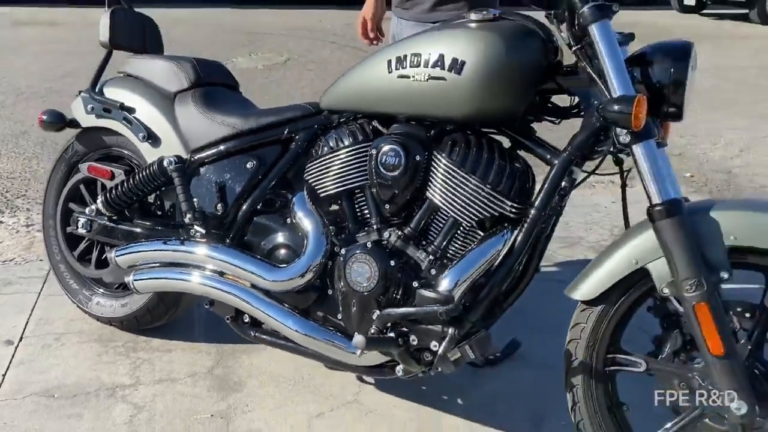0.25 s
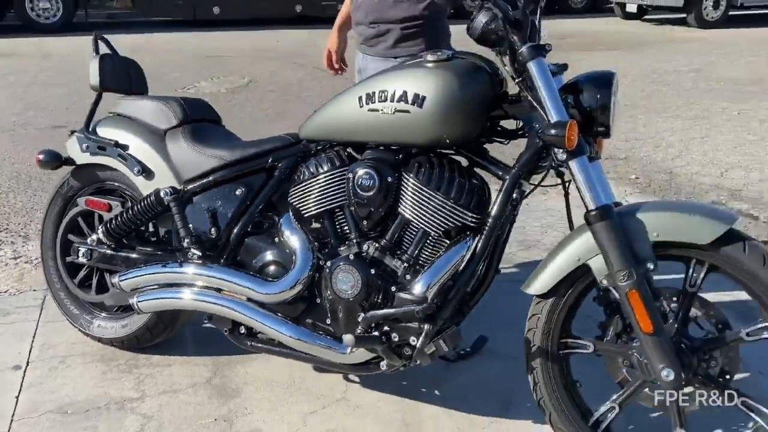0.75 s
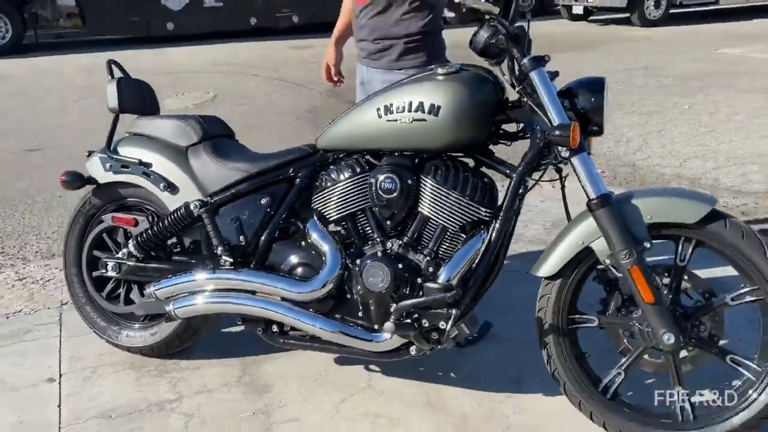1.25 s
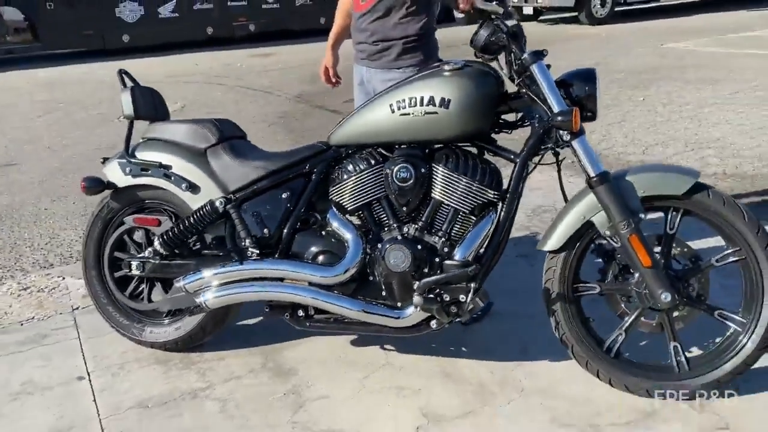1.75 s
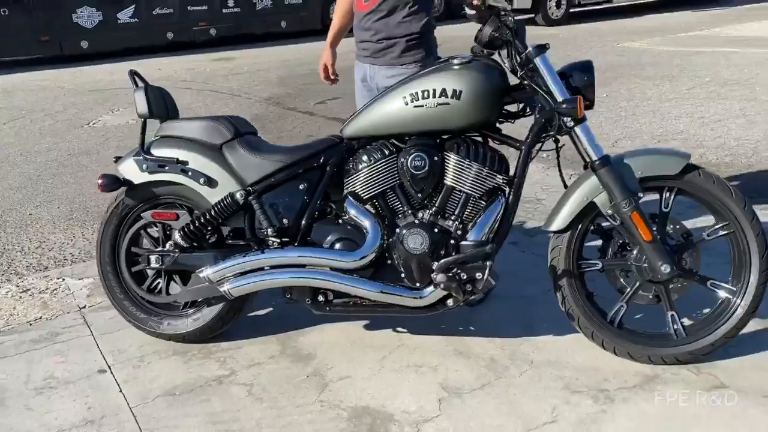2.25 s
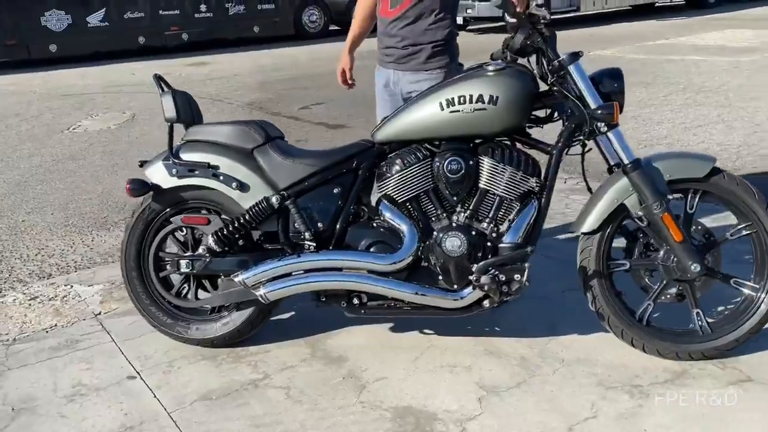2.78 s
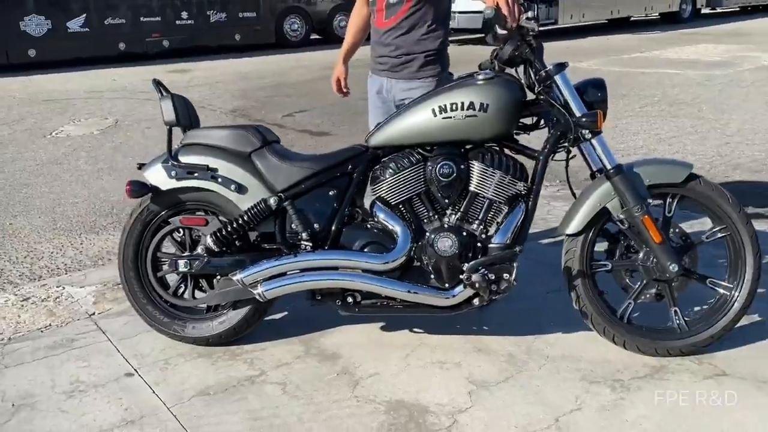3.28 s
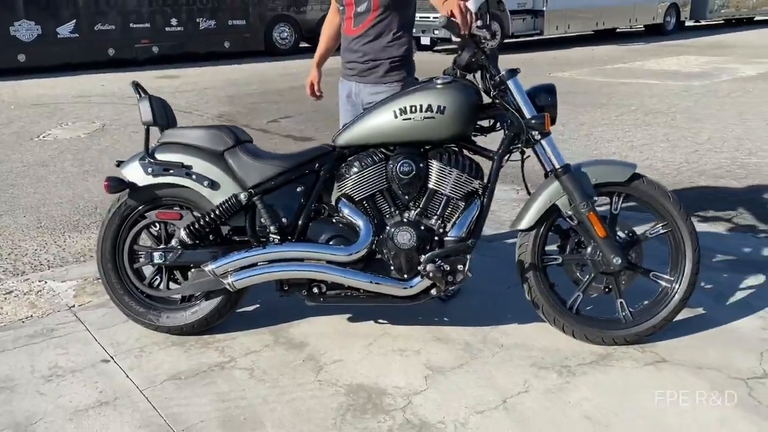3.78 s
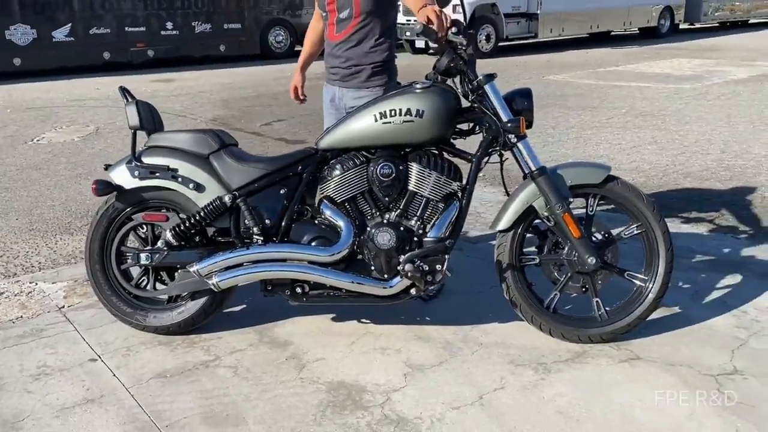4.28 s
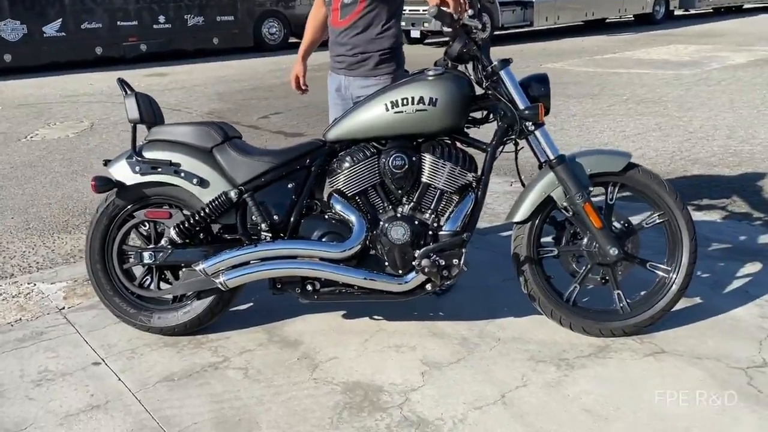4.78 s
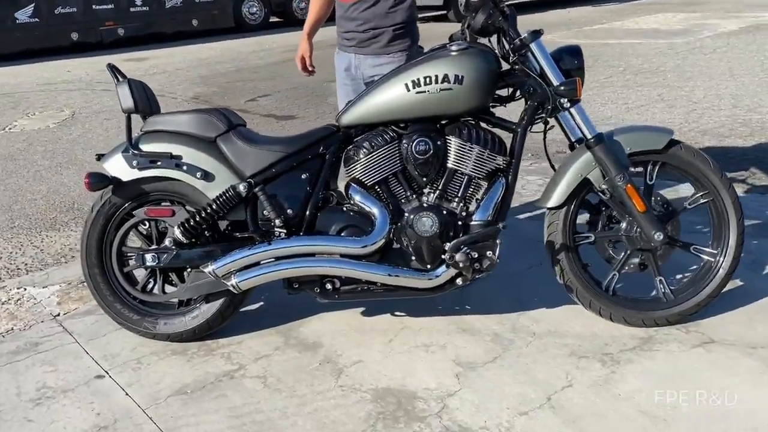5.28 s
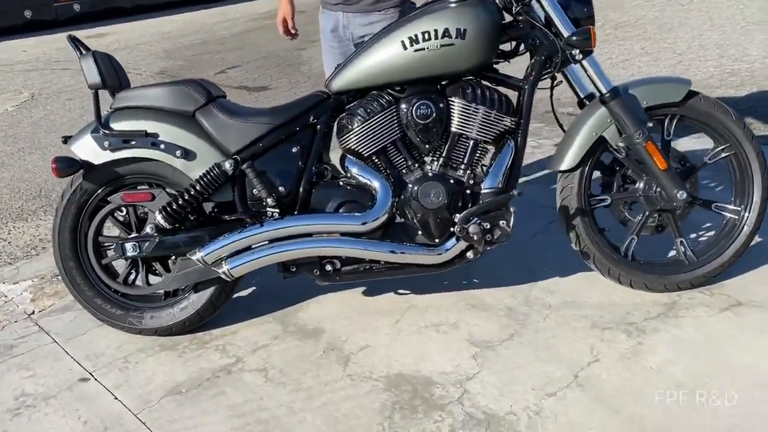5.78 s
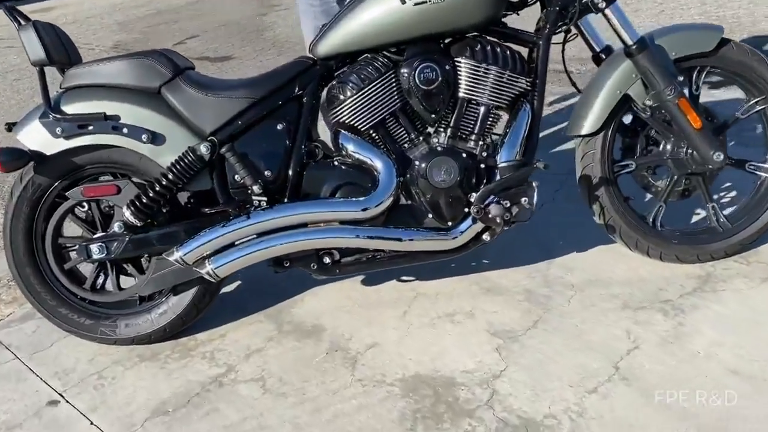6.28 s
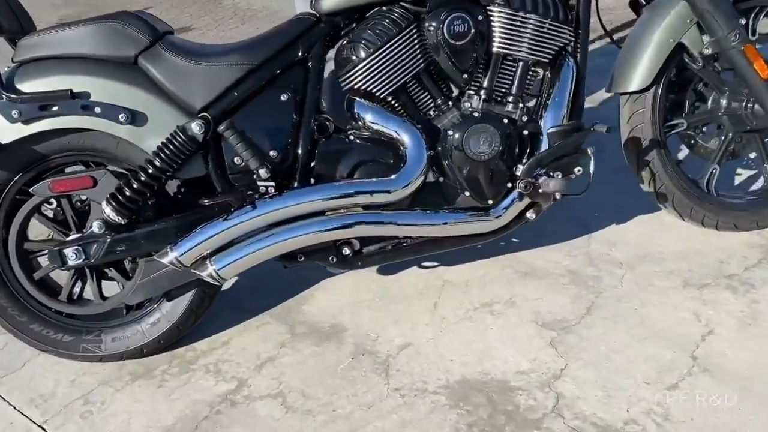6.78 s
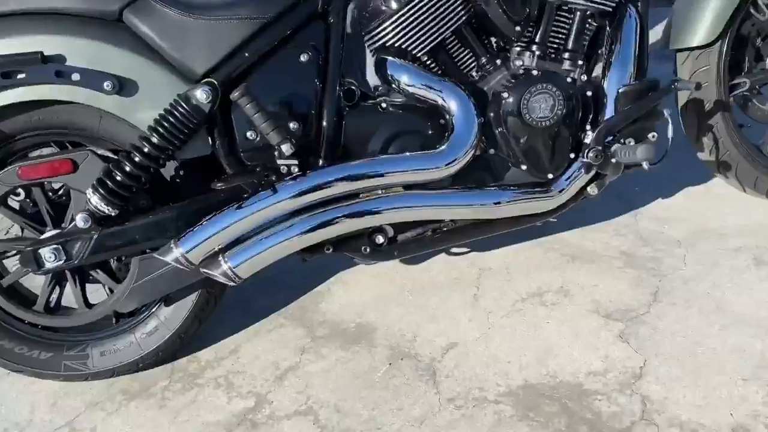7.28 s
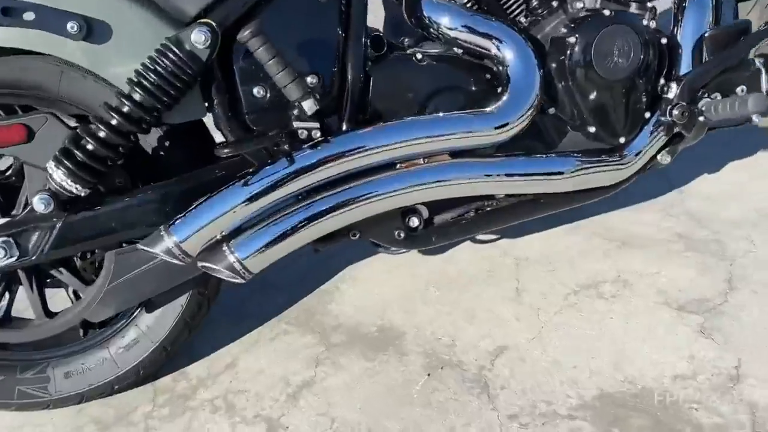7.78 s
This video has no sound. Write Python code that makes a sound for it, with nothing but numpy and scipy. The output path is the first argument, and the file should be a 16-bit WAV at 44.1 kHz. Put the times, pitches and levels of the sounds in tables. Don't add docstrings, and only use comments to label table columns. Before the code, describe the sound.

Short-piped motorcycle exhaust, heard outdoors by a small stereo microphone. Eight throttle blips of varied length surge from a loping, separate-beat rumble to a tearing drone, then slacken with stumbles and pops. Faint valve ticks and a very thin electrical whine show from about two seconds. The sound is farthest near four seconds, close and heavy at the end, over a faint distant outdoor wash.

```python
import sys
import numpy as np
from scipy import signal
from scipy.fft import rfft, irfft, next_fast_len
from scipy.io import wavfile
from scipy.ndimage import uniform_filter1d

SR = 44100
rng = np.random.default_rng(int(sys.argv[2]) if len(sys.argv) > 2 else 0)


def persist_wave(psi):
    counts = np.round(np.clip(psi, -1, 1) * 32767).astype(np.int16)
    wavfile.write(sys.argv[1], SR, np.atleast_2d(counts).T)


def volts_from_decibels(level):
    exponent = np.asarray(level, float) / 20
    return 10 ** exponent


N = 354563
TIME = np.arange(N) / SR
TICKS = np.arange(0, N / SR, .001)

# (opens [s], shuts [s], first charges fall short [dB], overrun after it [dB])
THROTTLE = [
    (-.1, 0, 0, 6),
    (0.18, 0.429, -1, 2),
    (0.605, 0.948, -3, 0),
    (1.935, 2.419, -6.5, -0.5),
    (3.643, 3.796, -6, -1.5),
    (3.992, 4.136, -10.5, -1),
    (4.275, 4.678, -9, -0.5),
    (5.484, 5.988, -7.5, 0.5),
    (7.615, 8.1, -2, -2),
]
# (picks up [s], tops out [s], top speed [cycles/s],
# braking after it [cycles/s per s], bow of the climb [ratio])
SPURTS = [
    (-0.1, -0.0, 21.0766, 53.7963, 0.2623),
    (0.1624, 0.434, 32.2409, 54.0419, 0.519),
    (0.5406, 0.898, 44.8863, 31.9573, 0.5502),
    (1.8494, 2.4152, 45.597, 32.9884, 0.9907),
    (3.5751, 3.7773, 25.9394, 64.9064, -0.6302),
    (3.901, 4.1351, 28.4668, 58.8902, 0.1376),
    (4.2244, 4.6555, 44.3094, 31.766, 0.8909),
    (5.4213, 6.0254, 45.5299, 33.1636, 1.3948),
    (7.6311, 8.039, 40.0127, 34.0, 0.6009),
]
# (from [s], to [s])
STUMBLE = [
    (.45, .6),
    (.97, 1.16),
    (2.44, 2.6),
    (4.7, 4.88),
    (6.0, 6.22),
]
CUT_DEPTH = [.5, 0.22, 0.5, 0.23, 0.88]
# boom, rasp, hiss [dB]
CUT_DB = [2.5, 1, -3]
# boom, rasp, hiss [dB]
NEAR_DB = [1.5, 2, 1]
# (speed [cycles/s], boom [dB], rasp [dB], hiss [dB])
PULLING = [(13.5, -14.5, -23, -24), (25.2, -13, -19.5, -21), (36.3, -15.5, -16.5, -19),
           (45.7, -17, -17.5, -18)]
# (speed [cycles/s], boom [dB], rasp [dB], hiss [dB])
COASTING = [(13.4, -30, -54, -70), (15.86, -24, -43.5, -58.5), (19.67, -18.5, -40.5, -49),
            (28.5, -16, -34, -39), (35.5, -14, -30, -36), (48.6, -17, -29.5, -32.5)]
# (frequency [Hz], width [Hz], level [dB])
FRONT_PIPE = [(107.4, 33.4, 2), (164.8, 50.7, 0.5), (264, 53, 2.5), (338, 50, -8), (426, 40, -23.5)]
# (frequency [Hz], width [Hz], level [dB])
REAR_PIPE = [(95.9, 37, 6), (195, 37, 2), (280, 31, 1), (311, 29, -8), (500, 42, -6)]
# (frequency [Hz], width [Hz], level [dB])
TIP_FAR = [(587, 1270, -9.5), (875, 106, 1.5), (1037, 210, -4.5), (1586, 297, 0), (2183, 266, -8)]
# (frequency [Hz], width [Hz], level [dB])
TIP_NEAR = [(640, 290, -5), (850, 187, 0), (1063, 180, -1), (1390, 350, -8), (1970, 380, -7)]
# (frequency [Hz], width [Hz], level [dB])
CONCRETE_BARK = [(1620, 190, -11)]
# (frequency [Hz], level [dB per Hz])
JET = [(1500, -56), (2300, -8.5), (3400, -3.5), (4700, -2.5), (6000, -10), (7400, -8.5), (8400, -19),
       (9400, -11.5), (10500, -12.5), (13500, -18), (15800, -27)]
# (frequency [Hz], level [dB per Hz])
VALVE_CLICK = [(2000, -40), (4500, -18), (9000, -7), (13000, -1), (15800, 0)]
# (frequency [Hz], level [dB rms])
CHARGING_TONES = [(14298, -63), (15332, -67), (13608, -72)]
# (frequency [Hz], level [dB per Hz])
YARD_WASH = [(25, -26), (50, -10.5), (300, 1), (1000, -14), (3000, -24), (8000, -42.5), (16000, -40)]
# (frequency [Hz], left leads by [rad])
LEFT_LEADS = [(0, 0), (1120, 0.6), (2410, 3.1), (3270, 7.1), (6630, 6.3), (9560, 0.4), (12900, 0.1),
              (16100, -6.3)]
# (frequency [Hz], left minus right [dB])
LEFT_OVER_RIGHT = [(380, 0.0), (700, 1.0), (1290, -1.0), (2380, 0.0), (4400, 7.5), (8120, 1.0),
                   (15000, 0.0)]
# (frequency [Hz], likeness [ratio])
LIKENESS = [(60, 1), (300, 1), (700, 0.9), (1400, 0.96), (3000, 0.27), (6000, 0.45), (15000, 0.6)]

START, VEE = -.72, .432
IDLE, KNEE = 12.8022, 6.9781
EASE = 1.5834
RETARD, RETARD_S, RETARD_AFTER_S = .1597, .0336, .0089
FILL_S = 0.13
SOFT_HZ, DULL_HZ, DULL_DB = 377, 193, 4
FARTHEST_S, FAR_SPAN_S = 3.85, 0.99
TAPPET_DB, TAPPET_S, TAPPET_SCATTER_DB = -38, .0007, 3.5
LOOSEST, LOOSE_SPAN = 26, 10


def exhaust():
    front = cylinder(0, FRONT_PIPE, size_db=2.5, lag=0.00297)
    rear = cylinder(VEE, REAR_PIPE, size_db=0.5, lag=0.00237)
    boom, rasp, hiss, shock = np.add(front, rear)
    ragged = rasp * crackle(2.17) + volts_from_decibels(3.0) * shock * [[1], [.45]]
    near = closeness(TIME)
    tips = filtered((1 - near) * ragged, modes(TIP_FAR, sign=-0.92))
    tips += filtered(near * ragged, modes(TIP_NEAR, sign=-1.047))
    far = np.exp(-((TIME - FARTHEST_S) / FAR_SPAN_S) ** 2)
    tips -= filtered(far * ragged, modes(CONCRETE_BARK, sign=-1))
    torn = volts_from_decibels(4.5) * filtered(tips, lambda hz: (1j * hz / (330 + 1j * hz)) ** 2) / 0.25
    torn += volts_from_decibels(2) * filtered(hiss * crackle(0.28), lambda hz: volts_from_decibels(along(JET, hz))) / 0.51
    churn = 3.5 * boom * uniform_filter1d(rng.standard_normal((2, N)), size=300)
    return ports(torn + churn + volts_from_decibels(11.5) * boom * [[1], [.45]])


def cylinder(offset, pipe, size_db, lag):
    speed = revs(TIME)
    crank = START + np.cumsum(speed) / SR - offset
    turn = np.floor(crank).astype(int) + 2
    fired = np.interp(np.arange(turn[-1] + 1) - 2, crank, TIME, left=-.03)
    since = TIME - fired[turn]
    boom_db, rasp_db, hiss_db = loudness(fired + 0.0018)
    stumble = sum((fired > a) & (fired < b) for a, b in STUMBLE)
    luck = rng.standard_normal((len(fired), 3))
    each = volts_from_decibels(size_db)
    burn = np.clip((hiss_db - boom_db + 24.0) / 9, 0, 1)
    charge = burn[turn]

    late = (0.0006 * stumble * luck[:, 2])[turn]
    width = (.075 - 0.042 * charge) / speed + 0.00011
    closing = (.49 - 0.1954 * charge) / speed
    suck = 0.35 + 0.049 * charge + 0.054 * np.maximum(21 - speed, 0)
    stroke = puff(since - lag - late, width)
    stroke -= suck * puff(since - lag - closing, 1.04 * width)
    gas = volts_from_decibels(boom_db - 2.5 * stumble + (.7 + 1.8 * stumble) * luck[:, 0])[turn] * stroke
    gas = each * gas * (0.0034 / width) ** 0.16 * (30 / speed) ** 0.32

    edge = np.clip(0.95 * burn + 1.06 * stumble + 0.033 * (revs(fired) - 22), 0, 1)[turn]

    def pipe_response(hz):
        blunt = volts_from_decibels(DULL_DB) / np.hypot(1, hz / DULL_HZ) / (1 + (hz / SOFT_HZ) ** 8)
        return modes(pipe, sign=0.99)(hz) * np.array([1 + 0 * hz, blunt])

    boom = filtered(np.array([edge, 1 - edge]) * gas, pipe_response).sum(axis=0)

    scatter_db = (1.5 + 1.6 * stumble) * luck[:, 1]
    slow = (30 / speed) ** 0.06 * (1.15 - 0.25 * charge)
    leak_db = 4.2 * (1 - charge)
    rasp_gate = 1.12 * puff(since + 0.00049, 0.0041 * slow) ** 1.42 + volts_from_decibels(-23 + leak_db)
    rasp = volts_from_decibels(rasp_db + scatter_db)[turn] * (30 / speed) ** 0.4 * rasp_gate
    hiss_gate = 1.26 * puff(since + 0.00094, 0.0039 * slow) ** 2.23
    hiss_gate += volts_from_decibels(-11.5 + leak_db - 60 * since / 0.081)
    hiss = volts_from_decibels(hiss_db + scatter_db)[turn] * (30 / speed) ** 1.23 * hiss_gate
    shock = volts_from_decibels(rasp_db + 12.7 * burn - 16)[turn] * puff(since - .0022, .00009)
    return boom, each * rasp, each * hiss, each * shock


def puff(since, width):
    u = np.maximum(since, 0) / width
    return u * np.exp(1 - u)


def crackle(depth_db):
    flutter = unit(uniform_filter1d(rng.standard_normal(N), size=25))
    return rng.standard_normal((2, N)) * volts_from_decibels(depth_db * flutter)


def revs(at):
    speed = np.full(len(TICKS), IDLE)
    for start, end, top, braking, bow in SPURTS:
        u = np.clip((TICKS - start) / (end - start), 0, 1) ** EASE
        low = np.interp(start, TICKS, speed)
        climb = low + (top - low) * (u + bow * u * (1 - u))
        braked = np.exp(-braking * np.maximum(TICKS - end, 0) / KNEE)
        fall = IDLE + KNEE * np.log1p(np.expm1((top - IDLE) / KNEE) * braked)
        speed = np.where(TICKS < start, speed, np.where(TICKS < end, climb, fall))
    slip = sum(np.exp(-.5 * ((TICKS - shut - RETARD_AFTER_S) / RETARD_S) ** 2)
               for _, shut, *_ in THROTTLE[1:-1])
    return np.interp(at, TICKS, speed - RETARD * slip / RETARD_S / np.sqrt(2 * np.pi))


def loudness(at):
    opens, shuts, short_db, overrun_db = np.transpose(THROTTLE)
    blip = np.maximum(np.searchsorted(opens, at) - 1, 0)
    speed = revs(at)

    def law(table):
        speeds, *levels = np.transpose(table)
        return np.array([np.interp(speed, speeds, level) for level in levels])

    shortfall = short_db[blip] * np.exp(-(at - opens[blip]) / FILL_S)
    pulling = law(PULLING) + np.outer([0.45, 1, 1.55], shortfall)
    cut = sum(depth * np.sin(np.pi * np.clip((at - a) / (b - a), 0, 1) ** 2.4) ** 2
              for (a, b), depth in zip(STUMBLE, CUT_DEPTH))
    coasting = law(COASTING) + overrun_db[blip] + np.outer(CUT_DB, cut)
    return np.where(at < shuts[blip], pulling, coasting) + np.outer(NEAR_DB, closeness(at))


def closeness(at):
    return np.clip((at - 6.3) / .7, 0, 1)


def drone():
    crank = uniform_filter1d(np.cumsum(revs(TIME)) / SR, size=3000, mode="nearest")
    boom_db, _, hiss_db = loudness(TICKS)
    level = uniform_filter1d(volts_from_decibels(np.interp(TIME, TICKS, boom_db)), size=900)
    shut = uniform_filter1d(1. * (np.interp(TIME, TICKS, hiss_db - boom_db) < -15), size=900)
    tone = lambda order: np.sin(2 * np.pi * order * (crank - .09))
    tones = volts_from_decibels(-7.5) * tone(order=5)
    tones -= volts_from_decibels(-6) * (1 - 0.9 * shut) * tone(order=7)
    tones += volts_from_decibels(-6.5) * shut * tone(order=3)
    return level * filtered(tones, lambda hz: 1j * hz / (70 + 1j * hz))


def valves():
    crank = START + np.cumsum(revs(TIME)) / SR
    turn = np.floor(crank).astype(int) + 2
    seated = np.interp(np.arange(turn[-1] + 1) - 2, crank, TIME)
    size = volts_from_decibels(TAPPET_SCATTER_DB * rng.standard_normal(len(seated)))
    size *= np.exp(-((revs(seated) - LOOSEST) / LOOSE_SPAN) ** 2)
    facing = np.clip((seated - 1.9) / .6, .2, 1) * (seated < 7.2)
    clicks = (size * facing)[turn] * puff(TIME - seated[turn], TAPPET_S) * rng.standard_normal((2, N))
    return volts_from_decibels(TAPPET_DB) * ports(filtered(clicks, lambda hz: volts_from_decibels(along(VALVE_CLICK, hz))))


def whine():
    speed = uniform_filter1d(revs(TIME), size=9000)
    on = np.clip((speed - 20) / 18, 0, 1) * (TIME > 2.2) * (TIME < 7.2)
    on *= volts_from_decibels(2.8 * unit(uniform_filter1d(rng.standard_normal(N), size=2500)))
    drift = np.cumsum(rng.standard_normal(N)) * .002
    tones = sum(volts_from_decibels(db + 5) * np.sin(2 * np.pi * hz * TIME + drift) for hz, db in CHARGING_TONES)
    return on * tones * volts_from_decibels([[.5], [-.5]])


def yard():
    wash = filtered(rng.standard_normal((2, N)), lambda hz: volts_from_decibels(along(YARD_WASH, hz)))
    return volts_from_decibels(-46) * ports(unit(wash))


def ports(pair):
    turn = lambda hz: np.arccos(np.clip(along(LIKENESS, hz), -1, 1)) / 2
    mid, side = filtered(pair, lambda hz: np.array([np.cos(turn(hz)), np.sin(turn(hz))]))

    def half(hz):
        lead = np.interp(hz, *np.transpose(LEFT_LEADS))
        return volts_from_decibels(along(LEFT_OVER_RIGHT, hz) / 2) * np.exp(.5j * lead)

    return filtered(np.array([mid + side, mid - side]), lambda hz: np.array([half(hz), 1 / half(hz)]))


def modes(table, sign):
    def response(f):
        return sum(sign ** k * volts_from_decibels(db) * 1j * f * width / (centre * centre - f * f + 1j * f * width)
                   for k, (centre, width, db) in enumerate(table))
    return response


def filtered(x, response):
    m = next_fast_len(N + SR // 2)
    return irfft(rfft(x, m) * response(np.fft.rfftfreq(m, 1 / SR)), m)[..., :N]


def along(points, hz):
    f, v = np.transpose(points)
    return np.interp(np.log(hz + 1), np.log(f + 1), v)


def unit(x):
    return x / np.sqrt(np.mean(x ** 2) + 1e-20)


def scene():
    return exhaust() + drone() + valves() + whine() + yard()


def top_cut(x):
    return signal.sosfilt(signal.butter(12, 16520, fs=SR, output="sos"), x)


def record(dry):
    x = filtered(dry, lambda hz: (1j * hz / (56 + 1j * hz)) ** 4)
    x = x / (1 + np.abs(x / .99) ** 4) ** (1 / 4)
    return top_cut(x)


dry = scene()
out = record(dry)
persist_wave(out)
```